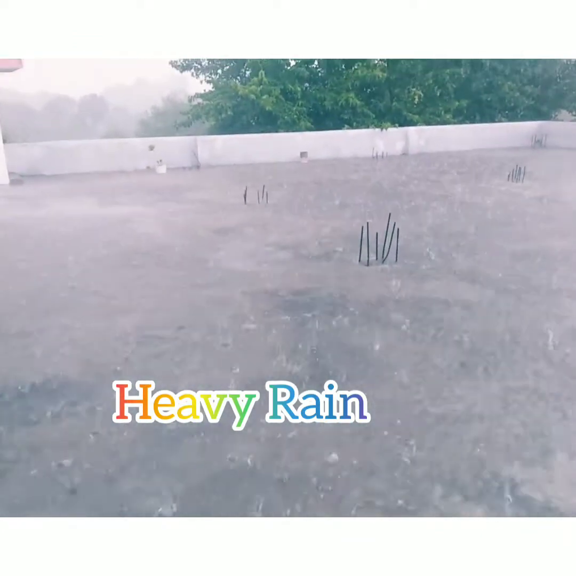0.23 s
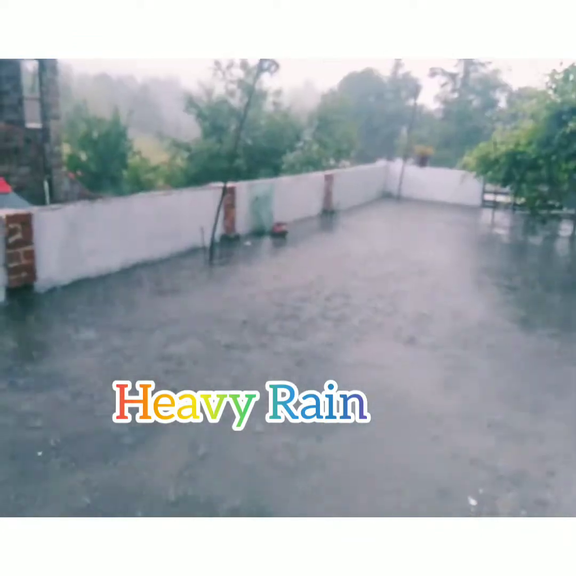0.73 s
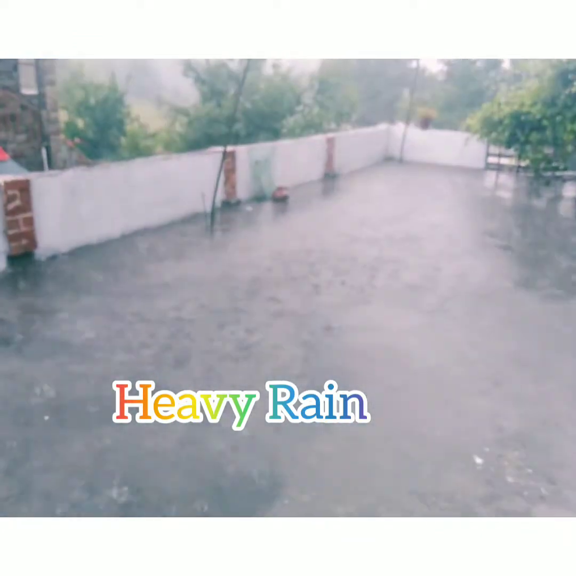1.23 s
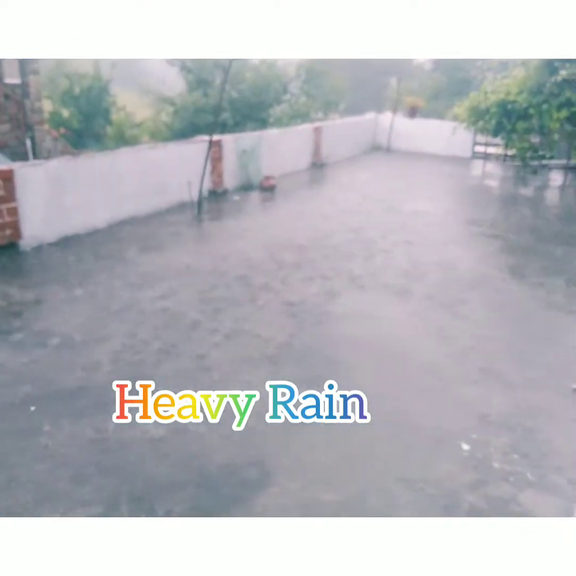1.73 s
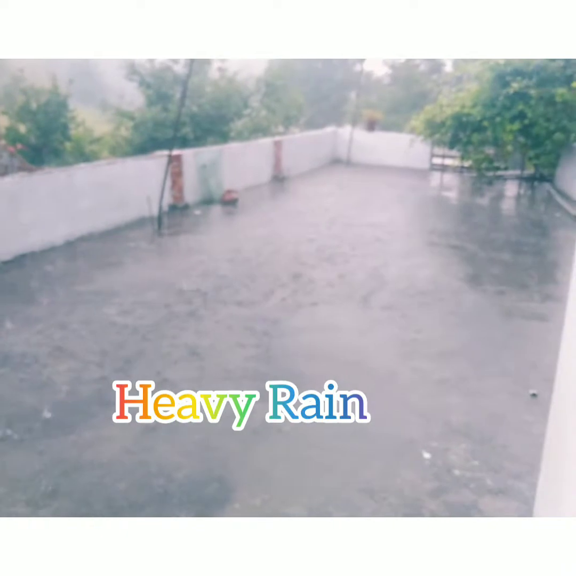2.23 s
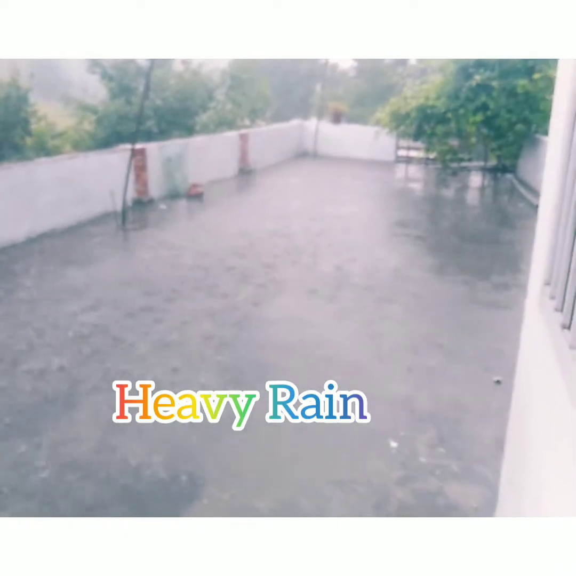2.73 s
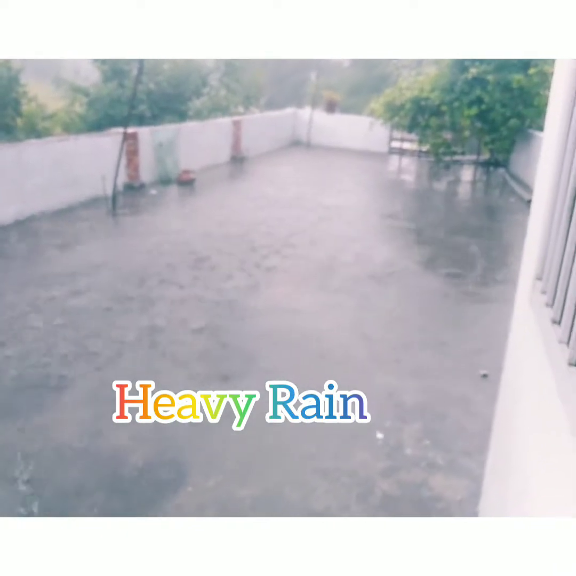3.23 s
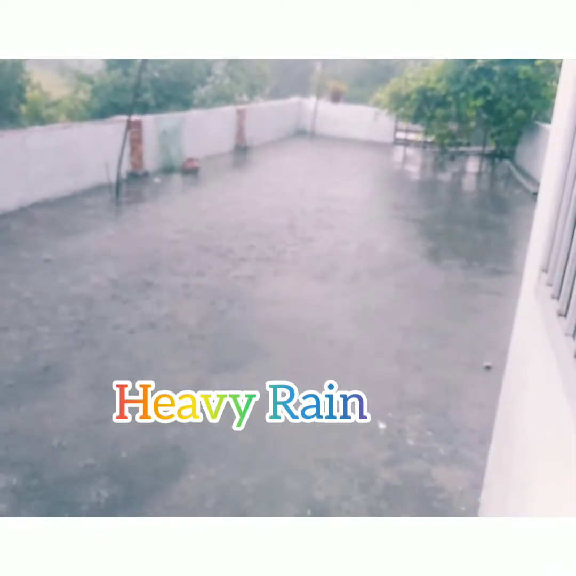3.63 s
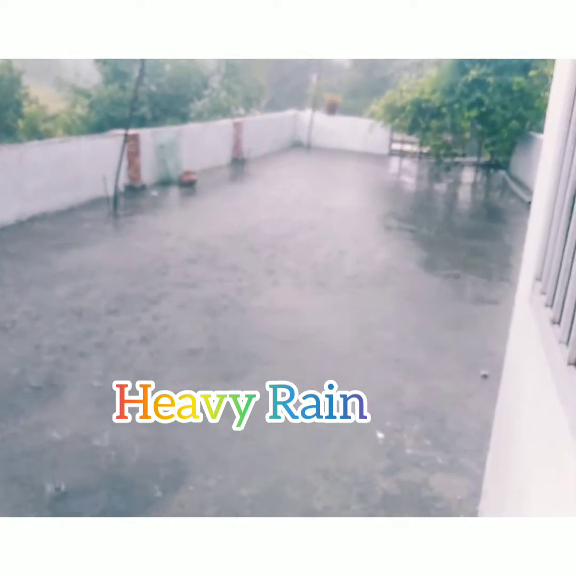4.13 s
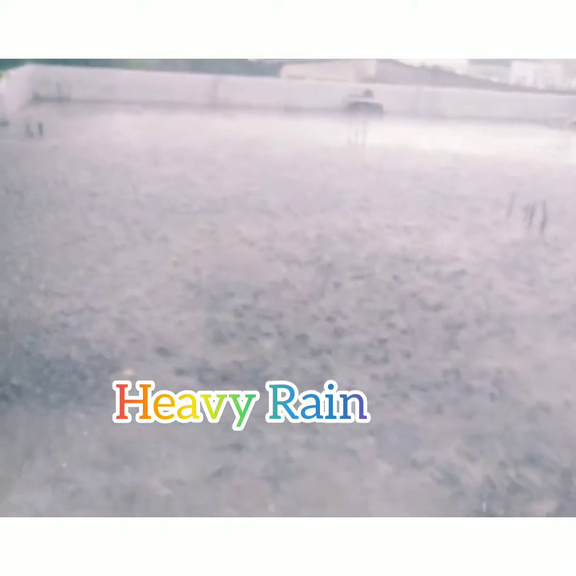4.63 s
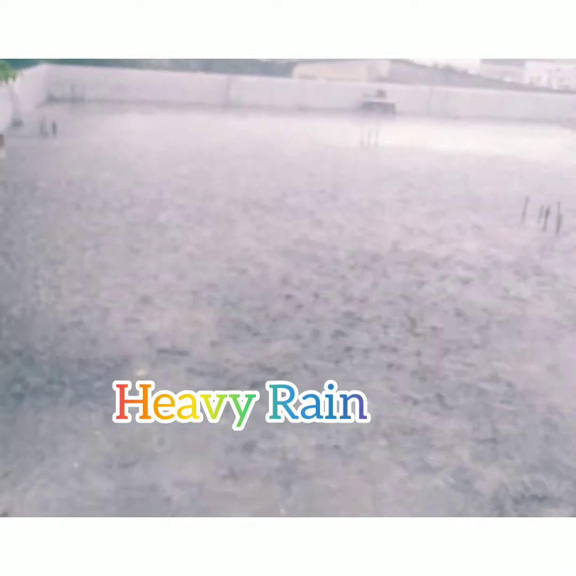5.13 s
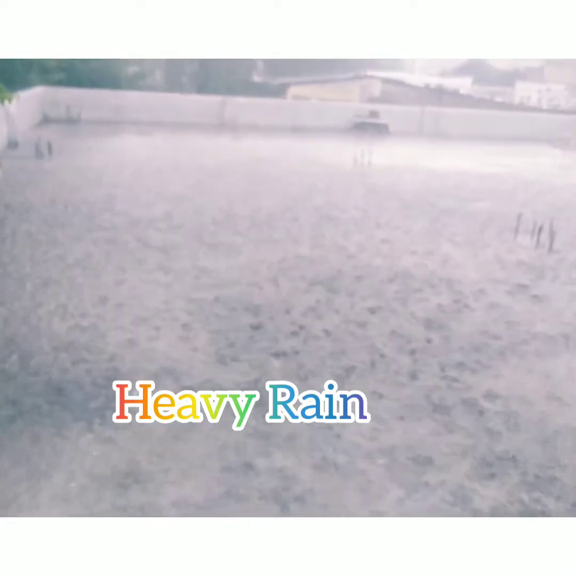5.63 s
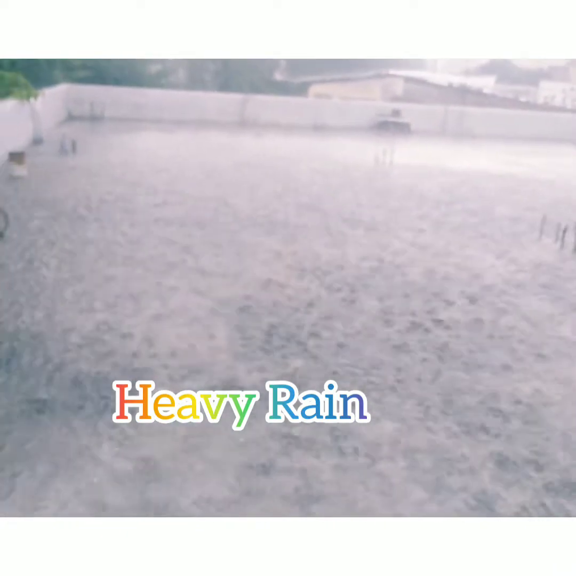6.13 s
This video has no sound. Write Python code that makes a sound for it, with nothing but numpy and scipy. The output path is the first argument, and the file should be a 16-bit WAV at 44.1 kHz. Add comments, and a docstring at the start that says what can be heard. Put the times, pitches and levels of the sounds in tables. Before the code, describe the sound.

Dense rainfall washes over a wet flat roof, fat drops cracking nearby above a low gusty rumble, interrupted twice by quick dips.

```python
"""Heavy rain on a flooded concrete roof, heard from three spots in turn with a quick fade between them.
From the start countless drops merge into a wash; closer ones spatter, plink and tick in flurries.
Under it lies a low noise rumble that swells with gusts, which also buffet the two microphone ports.
From the second spot on, fat drops splat close by with a crack and a short ring;
later, brief showers of fine spray sizzle, each a dense burst of tiny impacts."""
import sys
import numpy as np
from scipy import signal
from scipy.fft import rfft, irfft, next_fast_len
from scipy.io import wavfile
from scipy.ndimage import uniform_filter1d, map_coordinates

SR = 44100
rng = np.random.default_rng(int(sys.argv[2]) if len(sys.argv) > 2 else 0)


def inscribe(sig):
    """Save sig as 16-bit PCM at rate SR to the path in sys.argv[1].

    A 1-D sig is mono; a 2-D sig holds one channel per row.
    Samples are clipped to [-1, 1] before scaling.
    """
    pcm = np.round(np.clip(np.atleast_2d(sig).T, -1, 1) * 32767)
    wavfile.write(sys.argv[1], SR, pcm.astype(np.int16))


N = 281790

# Listening spots. Each row: fade-in start in seconds, fade-in length in seconds, fade-out start in seconds,
# spatter relative to the wash in dB at median strength, width of the rain 0-1, rumble between gusts in dB.
SPOTS = [(-.3, .25, 0.721, -14.5, 0.6, -26.5), (.756, 0.26, 4.736, -9.5, 0.9, -29),
         (4.767, 0.29, 6.5, -12, 1, -29.3)]
# Strength of the rain, one curve per spot. Each row: time in seconds, level in dB before WASH_DB.
STRENGTH_DB = [
    [(0.08, -18), (0.56, -19), (0.6, -18)],
    [(1.1, -25.5), (1.5, -25), (4.46, -26.5), (4.62, -27.5)],
    [(5.15, -24.5), (5.23, -24.5), (5.97, -24), (6.3, -24)],
]
# Spectrum of the wash. Each row: frequency in Hz, relative level in dB at spots 1, 2 and 3.
WASH_SPECTRUM = [(101, -25, -19, -54), (317, 1, -5, 0), (536, -1.5, -0.5, -1), (700, 0.5, 1.3, 2.5),
                 (1100, 0.5, -0.5, 1), (1490, -1.5, -2, -2.5), (2200, 0, -3, -2), (3770, -7, -3, -2),
                 (5130, -8, -5.5, -5), (7100, -7.5, -7, -6), (8700, -9.5, -8, -6.5), (12300, -6, -5, -4.5),
                 (15300, -23, -14, -12)]
# Spectrum of the closer drops. Each row: frequency in Hz, relative level in dB.
SPATTER_SPECTRUM = [(300, -32), (1200, 1.5), (2800, -10.5), (5200, 3), (8000, -2), (14000, -9)]
# Spectrum of drops on bare concrete. Each row: frequency in Hz, relative level in dB.
TICK_SPECTRUM = [(1500, -26), (4000, -3), (8000, 17), (14000, -20)]
# Colour of the left port against the right. Each row: frequency in Hz, gain in dB at spots 1, 2 and 3.
LEFT_PORT = [(450, 0, 0, 0), (1000, 0, 1, 1), (1600, .5, 1, 2.5), (2100, 2, 3.5, 4.5), (2700, 4, 7.5, 9),
             (3900, 2.5, 3.5, 5), (5500, 8.5, 5.5, 7), (6500, 5, 3, 3), (8000, -.5, -.5, 0),
             (10500, -5.5, -8, -8), (12800, -7, -4.5, -4.5), (14200, -5.5, -5, -2.5)]
# Spectrum of rumble and buffeting. Each row: frequency in Hz, relative level in dB.
RUMBLE_SPECTRUM = [(13, -56), (22, -13), (32, -28), (37, -24), (69, -5.5), (103, 1.5), (152, -1), (216, -6),
                   (261, -5), (328, -10.5), (450, -17), (580, -34), (990, -120)]
# Gusts of wind. Each row: start in seconds, hold in seconds, swell of the rumble in dB, port buffeting in dB.
GUSTS = [(-.1, 0.77, 2, -32), (0.912, .22, 2, -55), (1.278, 0.026, 3, -38), (1.472, .33, 4.5, -32),
         (3.507, 0.11, 7, -37.5), (3.712, 0.34, 3.5, -38), (4.43, 0.068, 2, -39), (5.123, 0.11, 1.5, -39)]
# Fat drops close by. Each row: time in seconds, ring level in dB before SPLAT_RING_DB, ring pitch in Hz,
# crack level in dB before SPLAT_CRACK_DB, t60 of the spray in seconds.
SPLATS = [(0.931, -22, 4480, -41, 0.053), (1.061, -25, 4100, -42, 0.009), (1.0861, -23, 4450, -28, 0.023),
          (1.2851, -27, 4400, -21, 0.031), (1.382, -18, 4900, -44, 0.058), (1.4673, -20.5, 3390, -28, 0.03),
          (1.4729, -21, 3070, -32, 0.014), (1.709, -25, 5860, -22, 0.029), (2.7823, -26, 5860, -26, 0.018),
          (2.8844, -21, 3500, -38, 0.027), (3.0186, -22, 3100, -27, 0.024),
          (3.038, -19, 5170, -27.5, 0.011), (3.3012, -21, 5170, -42, 0.051),
          (3.3283, -27, 5510, -42, 0.017), (3.3406, -22.5, 5170, -42, 0.015),
          (3.3664, -21.5, 4160, -27, 0.015), (3.4853, -26, 3470, -22.5, 0.043),
          (3.799, -23.5, 5510, -23, 0.008), (3.9534, -25, 5170, -42, 0.019),
          (3.9588, -21, 5760, -42, 0.017), (4.0242, -21, 6890, -21, 0.024), (4.1325, -25, 6340, -28, 0.009),
          (4.1373, -27, 6270, -31, 0.008), (4.2761, -26, 4900, -26, 0.016), (4.377, -25, 5140, -42, 0.021),
          (4.421, -23, 5100, -21, 0.01), (4.4332, -34.5, 5510, -39, 0.008),
          (4.5593, -27.5, 5510, -38, 0.008), (4.593, -21, 4080, -32, 0.0087),
          (5.0601, -27, 3100, -34, 0.01), (5.222, -27, 4820, -42, 0.012), (5.8219, -22, 4480, -35, 0.017),
          (5.9177, -22, 5170, -33, 0.0098), (6.2068, -21, 5080, -28, 0.008)]
# Showers of fine spray. Each row: start in seconds, peak level in dB.
SHOWERS = [(1.705, -22), (2.69, -30), (2.87, -24.5), (3.47, -27), (3.59, -28.5), (4.02, -27), (5.91, -26)]
# Spectrum of the fine spray. Each row: frequency in Hz, relative level in dB.
MIST_SPECTRUM = [(3000, -23), (7000, 4), (12000, 9), (14200, -23)]

PORT_GAP_M, SOUND_SPEED_M_S = .165, 343
WASH_DB = 3
SPATTER_DB_PER_DB = 0.71  # extra near spatter as the rain strengthens
GUST_RISE_S, GUST_FALL_S = 0.066, 0.12
SPLAT_RING_DB, SPLAT_CRACK_DB = -1.5, 2.5
SPLAT_PAN_DB = 1  # ring leans left, crack right
SLAP_T60_S, SPRAY_DB = 0.0021, -5  # spray relative to slap
SHOWER_RISE_S, SHOWER_FALL_S = 0.011, 0.15
TOP_HZ = 14450


def amp(db):
    """Decibels to gain."""
    return 10 ** (np.asarray(db) / 20)


def unit(x):
    """Scaled to rms 1."""
    return x / np.sqrt(np.mean(x ** 2) + 1e-20)


def curve(rows):
    """(s, value) rows as one value per sample."""
    return np.interp(np.arange(N) / SR, *np.transpose(rows))


def wobble(rate_hz):
    """A smooth random curve, rate_hz knots a second."""
    knots = rng.standard_normal(int(N * rate_hz / SR) + 4)
    return map_coordinates(knots, [np.arange(N) * rate_hz / SR])


def swell(start_s, rise_s, hold_s, fall_s):
    """An envelope from 0 to 1: rise, hold, fall."""
    t = np.arange(N) / SR - start_s
    falling = 1 - (t - rise_s - hold_s) / fall_s
    return np.clip(np.minimum(t / rise_s, falling), 0, 1)


def filtered(x, response):
    """x times a response of frequency."""
    size = next_fast_len(N + 8192)
    spectrum = rfft(x, size) * response(np.fft.rfftfreq(size, 1 / SR))
    return irfft(spectrum, size)[..., :N]


def coloured(x, points, column=1):
    """x shaped by one dB column of a table, read on log frequency."""
    table = np.transpose(points)
    return filtered(x, lambda hz: amp(np.interp(np.log(hz + 1), np.log(table[0]), table[column])))


def drops(count, spread_db, scatter_s, width):
    """Impacts from all around: each reaches the two ports with the delay of its bearing."""
    when = rng.uniform(0, N, count)
    bearing = rng.uniform(0, 2 * np.pi, count)
    lag_s = width * PORT_GAP_M / SOUND_SPEED_M_S * np.sin(bearing) + scatter_s * rng.standard_normal(count)
    lag = SR * lag_s
    size = amp(spread_db * np.clip(rng.standard_normal(count), -2, 2))
    size = size * rng.choice([-1, 1], count)
    arrivals = [np.round(when + side * lag / 2).astype(int) % N for side in (-1, 1)]
    return np.array([np.bincount(at, size, N) for at in arrivals])


def patchy(x, depth_db):
    """Small random patches of gain over time and frequency."""
    z = signal.stft(x, nperseg=512)[2]
    field = rng.standard_normal(z.shape[1:])
    for axis in (0, 1):
        field = uniform_filter1d(field, size=5, axis=axis)
    return signal.istft(z * amp(depth_db * unit(field)), nperseg=512)[1][:, :N]


def far_rain(spot, width):
    """The drops on the whole roof merge into a wash, with small random gain patches and a slight level wobble."""
    impacts = drops(count=200000, spread_db=3, scatter_s=.00004, width=width)
    wash = coloured(patchy(impacts, depth_db=1.5), WASH_SPECTRUM, column=spot + 1)
    return unit(wash) * amp(0.25 * wobble(22))


def splash(spray_db, spray_t60_s, slap_t60_s):
    """One drop on wet concrete: a sharp slap, then a spray of droplets, both decaying noise."""
    t = np.arange(SR // 25) / SR
    droplets = rng.standard_normal((2, len(t))) * amp(2 * rng.standard_normal((2, len(t))))
    slap = amp(-60 * t / slap_t60_s)
    spray = amp(spray_db - 60 * t / spray_t60_s)
    return droplets * (slap + spray)


def spatter(count=6):
    """Closer drops, in several shapes of splash, stand out one by one."""
    out = np.zeros((2, N))
    for _ in range(count):
        shape = splash(spray_db=-10, spray_t60_s=.04, slap_t60_s=.0035)
        hits = drops(count=190, spread_db=2.5, scatter_s=.00005, width=1)
        out += signal.oaconvolve(hits, shape, axes=1)[:, :N]
    return out


def plinks(count=900, pitch_hz=4700, cycles=24, spread_db=2.0):
    """Drops in the puddles trap small bubbles that ring briefly, rising in pitch."""
    t = np.arange(SR // 60) / SR
    hz = np.clip(pitch_hz * np.exp(0.368 * rng.standard_normal((count, 1))), 2400, 11000)
    age = t * hz / cycles  # the ring loses 20 dB per unit of age
    glide = 1 + 0.043 * np.minimum(age, 2)
    ring = np.sin(2 * np.pi * hz * t * glide) * amp(-20 * age)
    ring = ring * amp(spread_db * np.clip(rng.standard_normal((count, 1)), -2, 2))
    when = rng.integers(0, N, (count, 1)) + np.arange(len(t))
    bearing = rng.uniform(0, 2 * np.pi, (count, 1))
    lag = np.round(SR * PORT_GAP_M / SOUND_SPEED_M_S * np.sin(bearing)).astype(int)
    return np.array([np.bincount((at % N).ravel(), ring.ravel(), N) for at in (when, when + lag)])


def ticks():
    """Drops that land on nearly bare concrete make dry, bright ticks."""
    hits = drops(count=520, spread_db=4, scatter_s=.00005, width=1)
    shape = splash(spray_db=-22, spray_t60_s=.02, slap_t60_s=0.0036)
    return coloured(signal.oaconvolve(hits, shape, axes=1)[:, :N], TICK_SPECTRUM)


def near_rain(plink_db=-6, tick_db=-7):
    """Spatter, bubbles and ticks around the listener come in uneven flurries."""
    flurry = amp(0.83 * wobble(5.68) + 2.44 * wobble(22.05))
    splashes = unit(coloured(spatter(), SPATTER_SPECTRUM))
    return flurry * (splashes + amp(plink_db) * unit(plinks()) + amp(tick_db) * unit(ticks()))


def wind(calm_db):
    """A rumble common to both ports; each gust swells it and buffets each port with its own eddies."""
    swell_db, buffet = np.zeros(N), np.zeros(N)
    for start_s, hold_s, gust_db, buffet_db in GUSTS:
        gust = swell(start_s, GUST_RISE_S, hold_s, GUST_FALL_S)
        swell_db = np.maximum(swell_db, gust_db * gust)
        buffet = np.maximum(buffet, amp(buffet_db) * gust ** 2)
    rumble = amp(0.77 * wobble(9.7)) * unit(coloured(rng.standard_normal(N), RUMBLE_SPECTRUM))
    lumps = amp(5 * np.array([wobble(12), wobble(12)]))
    eddies = unit(coloured(rng.standard_normal((2, N)), RUMBLE_SPECTRUM) * lumps)
    return amp(calm_db + swell_db) * rumble + buffet * eddies


def at_level(x, db):
    """Each channel scaled to a level in dB, as rms over a hundredth of a second."""
    return x / np.linalg.norm(x, axis=1, keepdims=True) * np.sqrt(SR / 100) * amp(db)


def splats(ring_q=5.0, low_hz=4000):
    """Each fat drop hits the water film with a bright crack; its splash rings briefly around its own pitch."""
    out = np.zeros((2, N + SR))
    bright = signal.butter(2, low_hz, "high", fs=SR, output="sos")
    lean = amp([[SPLAT_PAN_DB], [-SPLAT_PAN_DB]])
    for start_s, ring_db, hz, crack_db, t60_s in SPLATS:
        hit = signal.sosfilt(bright, splash(SPRAY_DB, t60_s, SLAP_T60_S))
        ring = signal.lfilter(*signal.iirpeak(hz, ring_q, SR), hit)
        ring = at_level(ring, ring_db + SPLAT_RING_DB)
        crack = signal.sosfilt(bright, splash(SPRAY_DB, t60_s, SLAP_T60_S))
        crack = at_level(crack, crack_db + SPLAT_CRACK_DB)
        out[:, round(start_s * SR):][:, :hit.shape[1]] += ring * lean + crack / lean
    return out[:, :N]


def showers():
    """Thrown-up spray comes down as a brief, bright sizzle of tiny droplets."""
    level = sum(amp(db) * swell(start_s, SHOWER_RISE_S, 0, SHOWER_FALL_S) for start_s, db in SHOWERS)
    droplets = drops(count=9000, spread_db=3, scatter_s=.00005, width=0.68)
    return level * unit(coloured(droplets, MIST_SPECTRUM))


def ports(x, spot):
    """The left port resonates in the middle treble and is dull above; the right one is plain."""
    return np.array([coloured(x[0], LEFT_PORT, column=spot + 1), x[1]])


def scene(fade_out_db_per_s=1900, fade_from=0.047):
    """The three spots in turn, with slow fade-ins and quick fade-outs; harder rain spatters more."""
    t = np.arange(N) / SR
    near = near_rain()
    close = splats() + showers()
    out = np.zeros((2, N))
    for spot, (start_s, fade_in_s, end_s, spatter_db, width, calm_db) in enumerate(SPOTS):
        strength_db = curve(STRENGTH_DB[spot])
        excess_db = strength_db - np.median(strength_db)
        spattering = amp(spatter_db + SPATTER_DB_PER_DB * excess_db)
        rain = amp(strength_db + WASH_DB) * (far_rain(spot, width) + spattering * near) + close
        opening = (t > start_s) * np.minimum(fade_from + (t - start_s) / fade_in_s, 1)
        closing = amp(-fade_out_db_per_s * np.maximum(t - end_s, 0))
        out += opening * closing * (ports(rain, spot) + wind(calm_db))
    return out


def record(dry, limit_db=-2.0):
    """The highest peaks are rounded off, and the sound ends at TOP_HZ."""
    rounded = dry / (1 + (dry / amp(limit_db)) ** 10) ** (1 / 10)
    return filtered(rounded, lambda hz: hz < TOP_HZ)


dry = scene()
out = record(dry)
inscribe(out)
```